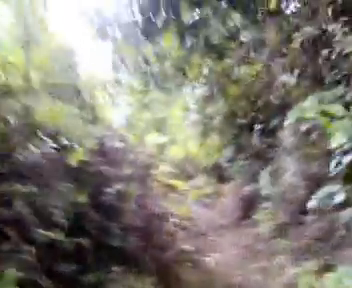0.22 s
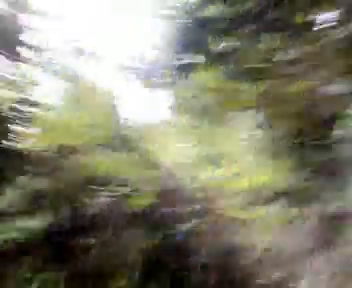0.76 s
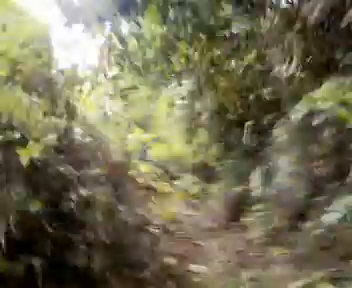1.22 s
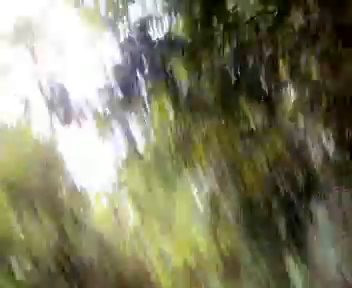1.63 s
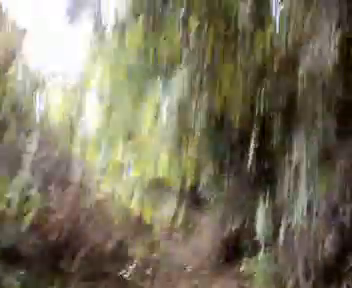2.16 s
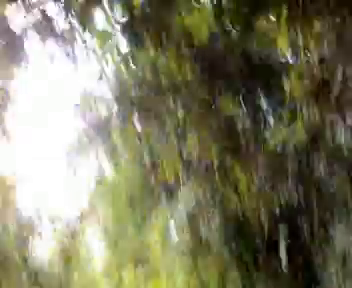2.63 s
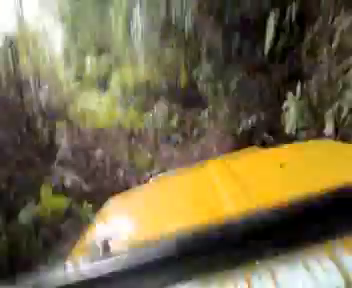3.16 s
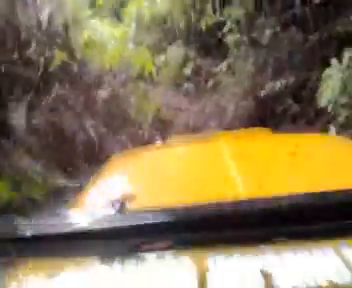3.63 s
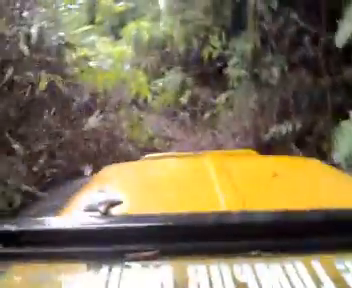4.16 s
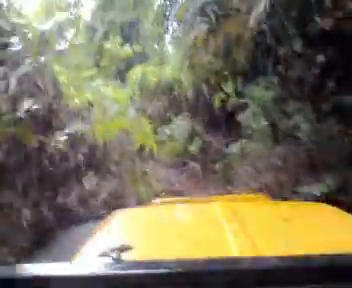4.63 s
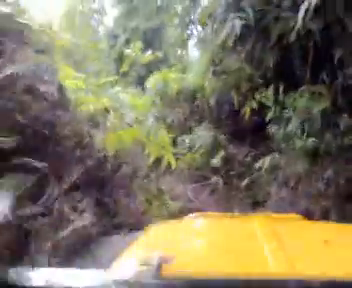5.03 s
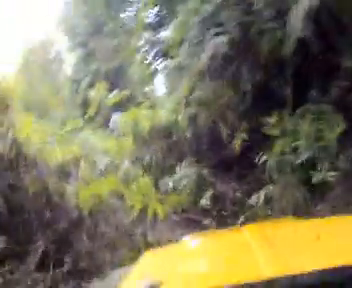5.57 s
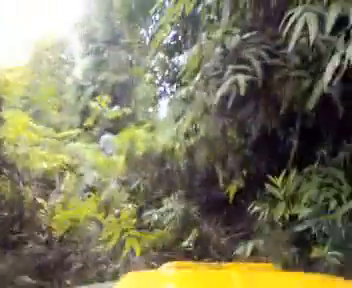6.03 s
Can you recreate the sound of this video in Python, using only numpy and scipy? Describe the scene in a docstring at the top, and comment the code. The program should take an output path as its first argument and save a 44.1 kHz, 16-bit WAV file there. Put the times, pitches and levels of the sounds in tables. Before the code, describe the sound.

A four-wheel-drive engine pulls hard at first, then settles into a slow, uneven rumble on a bumpy jungle trail. The microphone rides on the vehicle, picking up a low body throb, thuds from ruts and a light hiss of tyres and leaves. Sharp clicks and rattles from loose parts cluster in the middle. Branches scrape a side panel loudly near the start, then more faintly midway and at the end.

```python
"""A rough forest track, heard from on board a six-cylinder off-roader crawling up it.
Each source is an excitation shaped by resonators: crank harmonics sweep through fixed exhaust pipe
resonances, combustion rings the block, and the cabin drones and the body rumbles with engine load.
Tyres and leaves hiss, loose parts knock on the bumps, and brush scrapes along a side panel."""
import sys
import numpy as np
from scipy import signal
from scipy.io import wavfile
from scipy.ndimage import uniform_filter1d

SR = 44100
rng = np.random.default_rng(int(sys.argv[2]) if len(sys.argv) > 2 else 0)


def transcribe(signal):
    """Save signal, clipped to [-1, 1], as a 16-bit WAV file at the path in sys.argv[1]."""
    frames = np.atleast_2d(signal).T
    limited = np.clip(frames, -1, 1)
    pcm = np.round(limited * 32767).astype(np.int16)
    wavfile.write(sys.argv[1], SR, pcm)


N = 277389
TIME = np.arange(N) / SR


def undb(db):
    return 10 ** (np.asarray(db) / 20)


def unit_rms(x):
    return x / np.sqrt(np.mean(x ** 2))


def curves(table):
    """Linear interpolation of each column against the first, which is time."""
    times, *columns = np.transpose(table)
    return [np.interp(TIME, times, column) for column in columns]


def wander(rate_hz):
    """Smoothed sample-and-hold noise, with a spread near 1."""
    hold = int(SR / rate_hz)
    steps = np.repeat(rng.standard_normal(N // hold + 1), hold)
    return 1.22 * uniform_filter1d(uniform_filter1d(steps, hold), hold)[:N]


def resonate(x, modes):
    """Modal superposition: parallel band-pass resonators of alternating sign."""
    return sum((-1) ** k * undb(db) * signal.lfilter(*signal.iirpeak(hz, hz / width, SR), x)
               for k, (hz, width, db) in enumerate(modes))


def modal_noise(modes, envelope, flicker_db, flicker_hz):
    """Random excitation of modes that flicker independently, at unit RMS."""
    out = 0
    for hz, width, db in modes:
        mode = [(hz, min(1.66 * width, hz), 0)]  # widened, since two passes narrow the band
        gain = undb(db + flicker_db * wander(flicker_hz))
        force = envelope * rng.standard_normal(N)
        out += gain * resonate(resonate(force, mode), mode)
    return unit_rms(out)


# Each entry: relative level in dB of crank order 1, 2, 3, ..
# The manifold spaces the three firings of each turn unevenly.
CRANK_ORDER_DB = [-23.5, -32.5, -16, -11, -7.5, 4, -0.5, -9, -0.5, 2, -5, -2.5, 1.5, -5.5, -11.5, -6, -15.5,
                  -7.5, -7, -7.5, -10, -6.5]
# Pipe resonances. Each row: frequency in Hz, width in Hz, gain in dB.
PIPE_MODES = [(64.6, 42, -14), (146, 21.7, -8.5), (206.2, 14.3, 3.5), (277, 10.4, -5), (315, 21, -13),
              (481, 90, -9)]


def exhaust(turns, load_db, firing_db):
    """Source and filter: wavering crank harmonics and turbulent gas excite the pipe's resonances."""
    strain_db = np.maximum(load_db - 6.5, 0)  # past this load the orders lurch and the gas roars
    orders = 0
    for order, db in enumerate(CRANK_ORDER_DB, start=1):
        emphasis_db = firing_db if order % 3 == 0 else 0  # the firings make every third order
        waver_db = 1.5 * wander(4.5)
        lurch_db = .7 * strain_db * wander(13.3)
        harmonic = np.sin(2 * np.pi * (order * turns + rng.random()))
        orders += undb(db + emphasis_db + waver_db + lurch_db) * harmonic
    gas = unit_rms(resonate(rng.standard_normal(N), PIPE_MODES))
    gas_db = -7 - .5 * load_db + 1.1 * strain_db
    return resonate(orders, PIPE_MODES) + undb(gas_db) * gas


# Engine block modes. Each row: frequency in Hz, nominal width in Hz, relative level in dB.
BLOCK_MODES = [(966, 104, 3.5), (1135, 83, 3), (1315, 96, 2), (1464, 92, 2), (1758, 244, 0),
               (2040, 150, -2), (2227, 71, 3), (2357, 240, -1.5), (2716, 400, -6), (3550, 970, -9)]


def clatter(turns, load_db):
    """Impulsive excitation: combustion knock rings the block with noise that jumps at each firing."""
    firing_phase = 3 * turns % 1
    pulses = 1 + .31 * np.exp(-firing_phase / .53)
    return undb(-30 + load_db) * modal_noise(BLOCK_MODES, pulses, flicker_db=2, flicker_hz=15)


# Floor vibration. Each row: time in seconds, RMS level in dB.
THROB_LEVELS = [(0, -29.5), (.46, -22.5), (.6, -23.5), (.75, -34), (1.3, -30.5), (1.75, -31.5), (2.0, -32),
                (3.05, -44.5), (3.6, -26.5), (4.5, -27), (4.7, -43), (5.2, -42), (5.35, -31.5), (5.55, -47),
                (6.29, -27.5)]


def throb(turns):
    """Structure-borne sound: the floor carries the firing fundamental, three cycles a turn."""
    return np.sqrt(2) * undb(curves(THROB_LEVELS)[0]) * np.sin(2 * np.pi * 3 * turns)


# Chassis modes. Each row: frequency in Hz, nominal width in Hz, relative level in dB.
CHASSIS_MODES = [(24, 56, -6.5), (41.4, 30, -1), (77, 36, 0.5), (107, 40, -4.5)]
# Wheels dropping into ruts. Each row: time of the peak in seconds, extra rumble in dB.
RUT_JOLTS = [(.5, 3), (1.05, 7.5), (1.28, 2), (1.82, 8.5), (2.5, 0), (3.5, 8), (5.2, 6), (6.0, 3)]


def rumble(load_db, rise_s=.065, fall_s=.2):
    """Forced vibration: load shakes the chassis, and each rut adds a quick swell that sinks slowly."""
    jolt_db = sum(db * np.exp(np.minimum((TIME - peak) / rise_s, (peak - TIME) / fall_s))
                  for peak, db in RUT_JOLTS)
    shaking = modal_noise(CHASSIS_MODES, 1, flicker_db=1.5, flicker_hz=6)
    return undb(-38 + .97 * load_db + jolt_db) * shaking


# Cabin modes. Each row: frequency in Hz, nominal width in Hz, relative level in dB.
CABIN_MODES = [(313, 96, -4), (459, 47, -5.5), (593, 56.5, -1.5), (686.5, 59, -2.5), (812.5, 78, -6)]


def drone(load_db):
    """Resonance: the cabin's modes colour noise that grows with engine load."""
    return undb(-30.5 + 1.276 * load_db) * modal_noise(CABIN_MODES, 1, flicker_db=-.4, flicker_hz=7)


# Spectrum of the hiss. Each row: frequency in Hz, nominal width in Hz, relative level in dB.
HISS_BANDS = [(1500, 1200, 1.5), (3430, 3000, 6.5), (4800, 1380, 7.5), (6450, 1300, -30.5)]
# Course of the hiss. Each row: time in seconds, level in dB.
HISS_LEVELS = [(0, -28), (.4, -29.5), (1.3, -37.5), (1.75, -33), (1.92, -31), (2.5, -30.5), (3.0, -26.5),
               (3.4, -30), (3.55, -26), (4.4, -24.5), (5.0, -28), (5.75, -30.5), (6.29, -33)]


def hiss():
    """Granular noise: dense small contacts of tyres, grit and leaves merge into a hiss."""
    grains = undb(wander(300))
    return undb(curves(HISS_LEVELS)[0]) * modal_noise(HISS_BANDS, grains, flicker_db=2.14, flicker_hz=14)


# Modes of a loose part. Each row: frequency in Hz, relative level in dB, 60 dB decay time in seconds.
PART_MODES = [(705, -4, .09), (1300, -4, .025), (1750, -2, .025), (2288, -2, .035), (2729, -2, .035),
              (3330, 1, .025), (3900, -3, .018), (4620, -1, .02), (5050, -2, .018), (5600, -3, .018),
              (6100, -5, .015)]
# Blows. Each row: start in seconds, peak level in dB, brightest frequency in Hz,
# spread in octaves, rattle time in seconds.
PART_BLOWS = [(0.149, -9.5, 3730, 0.24, 0.037), (0.204, -6, 2600, .8, 0.0048),
              (1.275, -21.5, 5500, 0.51, 0.015), (2.541, -8.5, 2380, 0.45, 0.0098),
              (2.562, -13.5, 3560, 0.32, .006), (2.679, -9.5, 3200, 1.3, 0.0055),
              (3.164, -14, 1500, 0.43, 0.013), (3.417, -12, 4800, 0.11, 0.025),
              (3.425, -10.5, 710, .15, 0.049), (3.434, -7, 2170, 0.46, 0.037),
              (3.447, -11, 3200, .8, 0.0045), (3.468, -9.5, 4800, 0.44, 0.014),
              (3.562, -19, 5600, 0.13, .02), (3.572, -12.5, 2900, 0.77, 0.052),
              (3.58, -17, 4600, 0.3, 0.024), (3.684, -11, 2380, 0.33, 0.0057),
              (4.065, -11, 4500, 0.66, 0.0067), (4.313, -0.5, 3520, 1.3, 0.0024),
              (4.317, -6, 4600, 0.49, 0.012), (4.498, 1, 4620, 0.25, 0.0026),
              (4.499, 0.5, 3330, 0.093, 0.0025), (4.502, -9.5, 5000, 0.43, 0.03),
              (4.759, -12.5, 1990, .6, 0.007), (5.79, -16, 4000, 0.81, 0.0033),
              (5.975, -13, 4000, 1.1, .004)]


def knocks():
    """Impact excitation: a burst of contacts rings the modes nearest the blow's brightest frequency."""
    out = np.zeros(N + SR)
    t = np.arange(SR // 4) / SR
    for start, peak_db, centre_hz, octaves, rattle_s in PART_BLOWS:
        contact = rng.standard_normal(len(t)) * np.exp(-(t / rattle_s) ** 2)
        contact[0] += 4  # the first touch is the hardest
        response = 0
        for hz, mode_db, t60 in PART_MODES:
            weight = undb(mode_db) * np.exp(-.5 * (np.log2(hz / centre_hz) / octaves) ** 2)
            response += weight * np.sin(2 * np.pi * hz * t) * undb(-60 * t / t60)
        ringing = signal.fftconvolve(contact, response)[:len(t)]
        crack = resonate(contact, [(centre_hz, centre_hz * octaves, 0)])
        hit = unit_rms(ringing) + unit_rms(crack)
        onset = int(start * SR)
        out[onset:onset + len(t)] += undb(peak_db) * hit / np.abs(hit).max()
    return out[:N]


# The side panel's lower and upper modes, and the band where hard twigs bite.
# Each row: frequency in Hz, nominal width in Hz, relative level in dB.
PANEL_LOWER_MODES = [(1015, 260, -2), (1328, 170, -1), (1846, 330, -4.5), (2090, 550, -5.5),
                     (2386, 250, -5), (2730, 140, -5)]
PANEL_UPPER_MODES = [(3330, 600, -10.5), (4170, 310, -4), (5000, 500, -10.5), (5300, 120, -3.5),
                     (6600, 2200, -22)]
TWIG_RASP = [(2080, 550, 0)]
# Brush strokes. Each row: start, end and rise time in seconds, level in dB, change by the end in dB,
# then upper modes and rasp in dB relative to the lower modes.
BRUSH_STROKES = [(0.504, 0.775, 0.036, -12, -4.5, -6.5, -2.5), (3.975, 4.489, 0.068, -22, 0.5, -16, -13),
                 (5.93, 6.4, 0.22, -20.5, -0.5, -8, -8.5)]


def scrapes(release_s=.027):
    """Frictional excitation: brush presses on, drags and slides off, ringing the side panel."""
    grit = undb(wander(200))
    lower, upper, rasp = (modal_noise(modes, grit, flicker_db=-.5, flicker_hz=26)
                          for modes in (PANEL_LOWER_MODES, PANEL_UPPER_MODES, TWIG_RASP))
    out = 0
    for start, end, rise_s, db, change_db, upper_db, rasp_db in BRUSH_STROKES:
        attack = np.clip((TIME - start) / rise_s, 0, 1)
        release = np.exp(np.minimum(end - TIME, 0) / release_s)
        pressure = undb(db + np.interp(TIME, [start, end], [0, change_db]))
        out += attack * release * pressure * (lower + undb(upper_db) * upper + undb(rasp_db) * rasp)
    return out


# Engine speed. Each row: time in seconds, crank rate in Hz.
CRANK_SPEED = [(0, 22.7), (.2, 23), (.3, 22), (.42, 21.9), (.58, 27.4), (.79, 34.1), (.88, 35.2),
               (1.19, 26.6), (1.33, 23.9), (1.44, 22.5), (1.82, 19.4), (1.94, 19.3), (2.21, 20.6),
               (2.43, 18.8), (2.68, 17.5), (3.13, 16.5), (3.41, 19.7), (3.5, 20.0), (3.64, 19.5),
               (3.94, 21.0), (4.22, 21.4), (4.5, 19.8), (4.72, 17.0), (4.95, 15.4), (5.14, 15.3),
               (5.27, 17.3), (5.41, 20.0), (5.6, 21.2), (5.75, 21.2), (5.9, 20.2), (6.1, 18.6), (6.2, 18.3),
               (6.29, 18.6)]
# Engine effort. Each row: time in seconds, load in dB above a crawl, exhaust gain in dB,
# emphasis of the firing orders in dB.
ENGINE_EFFORT = [(0, 11, -16, 5.5), (.15, 13, -17.5, -1.5), (.3, 11.5, -16.5, 2), (.45, 12, -13, 1),
                 (.8, 9.5, -17.5, 2.5), (1.0, 6.5, -18.5, -8.5), (1.12, 4, -15.5, -2.5),
                 (1.3, 2.5, -26.5, 9.5), (1.55, 0.5, -20, -2), (1.75, -1.5, -25.5, 6),
                 (1.9, 0.5, -21.5, -6.5), (2.05, 0, -24, 6.5), (2.2, -0.5, -21, -8), (2.5, 0, -24, 4.5),
                 (2.75, 0, -22, 5), (3.3, 1.5, -22, 1.5), (3.5, 3, -19.5, 1), (3.75, 5, -21.5, -1.5),
                 (3.95, 3.5, -17.5, -2), (4.3, 5, -17.5, -2.5), (4.5, 3, -23.5, 8.5), (4.65, 0, -26.5, 7.5),
                 (4.95, 0.5, -25.5, 10), (5.3, 1, -23, 4.5), (5.55, 2, -21, -4), (5.82, 1.5, -21, 1.5),
                 (5.92, 4.5, -24, 8), (6.29, 0.5, -22.5, 7.5)]


def scene():
    """Superposition: the sources add, with one load driving clatter, rumble, drone and exhaust roughness."""
    turns = np.cumsum(curves(CRANK_SPEED)[0]) / SR
    load_db, exhaust_db, firing_db = curves(ENGINE_EFFORT)
    engine = undb(exhaust_db) * exhaust(turns, load_db, firing_db)
    engine += clatter(turns, load_db) + throb(turns)
    body = rumble(load_db) + drone(load_db)
    return (engine + body + hiss() + scrapes() + knocks())[None]


def record(dry, ceiling=.7, dc_offset=-.012):
    """Saturation and band limiting: the input stage rounds peaks, sits off zero and cuts the treble."""
    x = dry / (1 + (dry / ceiling) ** 4) ** (1 / 4) + dc_offset
    x = signal.sosfilt(signal.butter(8, 7250, fs=SR, output="sos"), x)
    x = signal.sosfilt(signal.ellip(8, .5, 30, 7580, fs=SR, output="sos"), x)
    return signal.sosfilt(signal.ellip(8, .2, 60, 8818, fs=SR, output="sos"), x)


dry = scene()
out = record(dry)
transcribe(out)
```